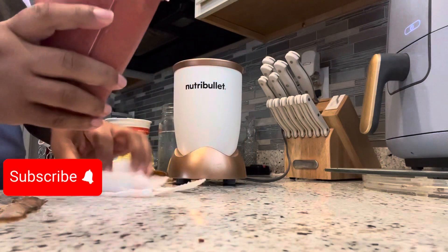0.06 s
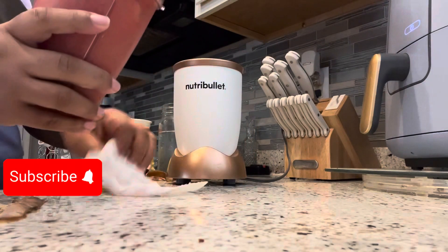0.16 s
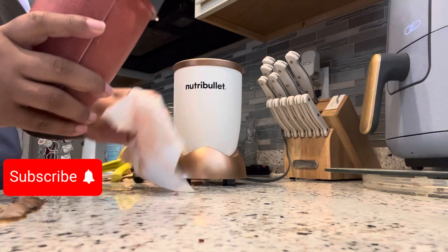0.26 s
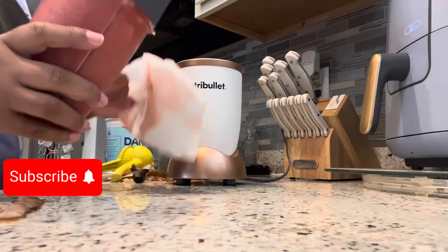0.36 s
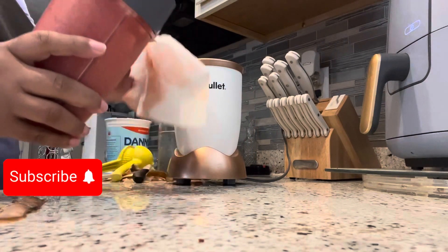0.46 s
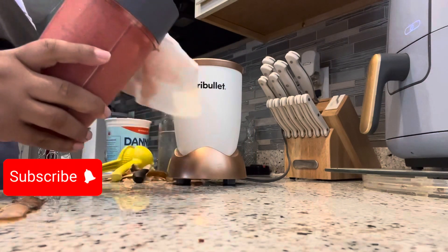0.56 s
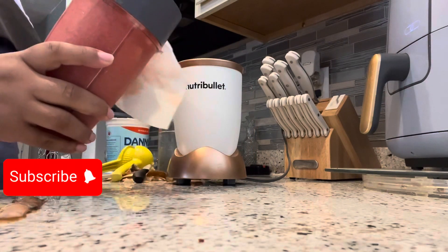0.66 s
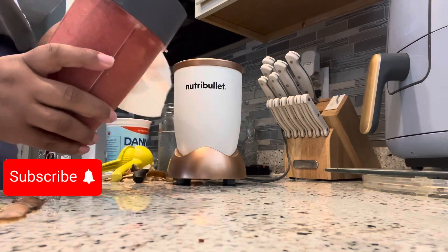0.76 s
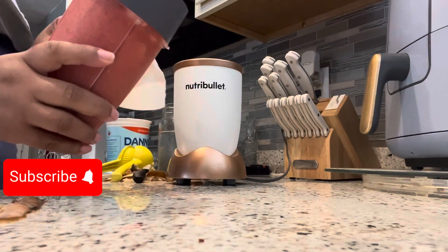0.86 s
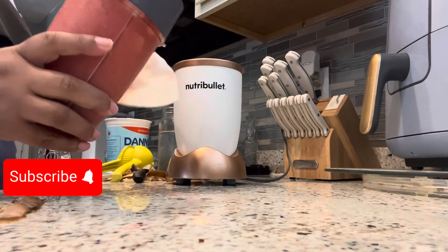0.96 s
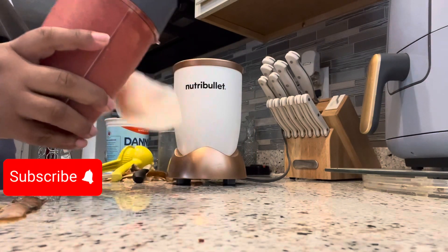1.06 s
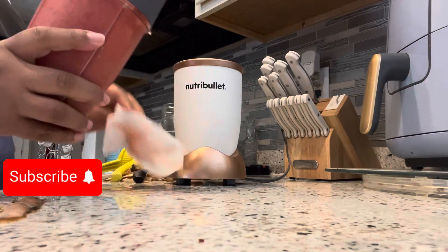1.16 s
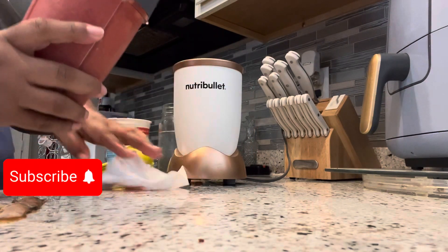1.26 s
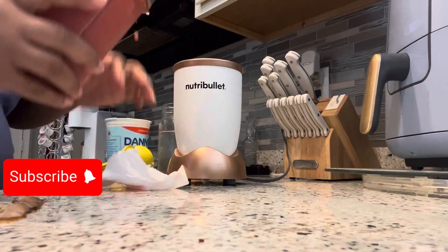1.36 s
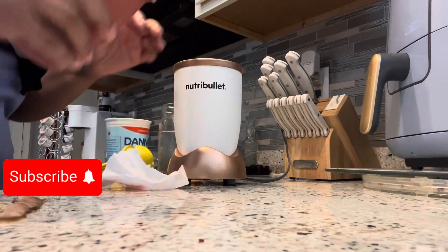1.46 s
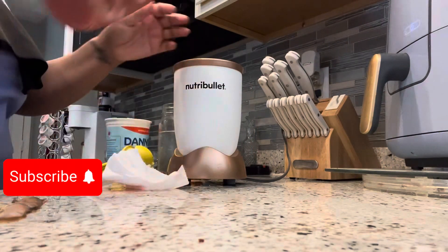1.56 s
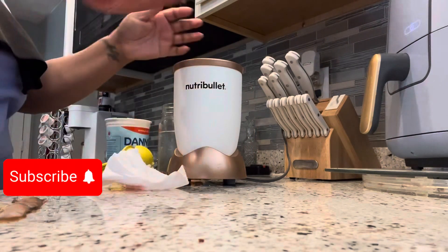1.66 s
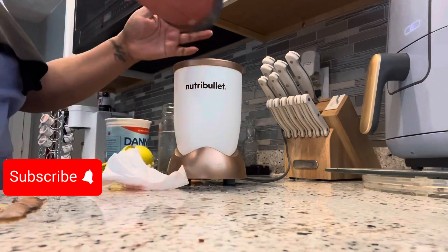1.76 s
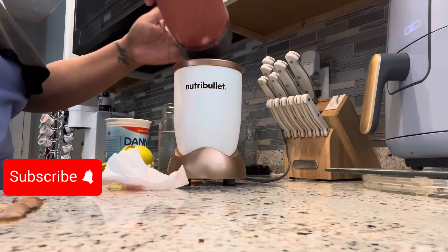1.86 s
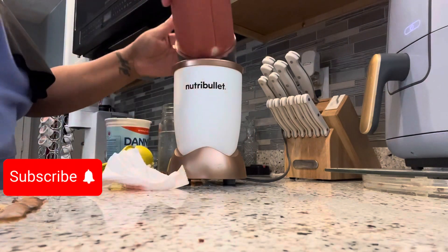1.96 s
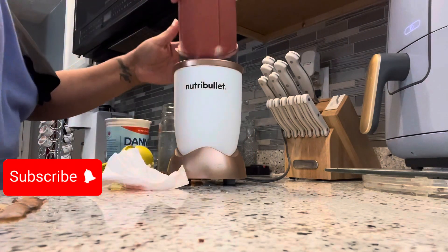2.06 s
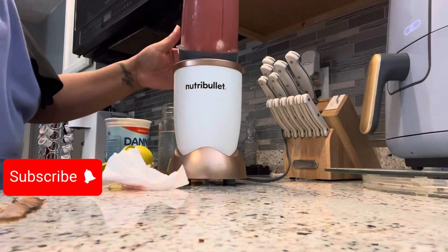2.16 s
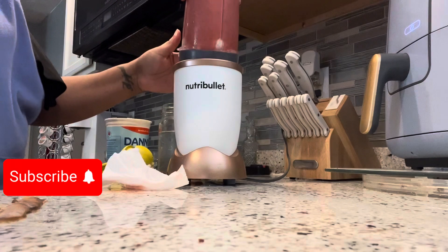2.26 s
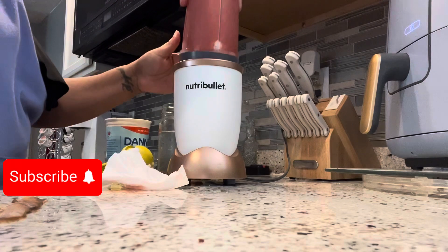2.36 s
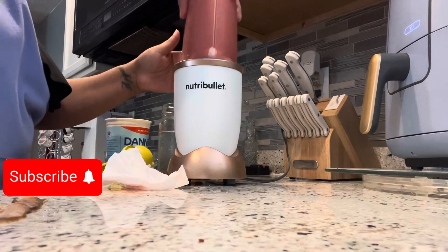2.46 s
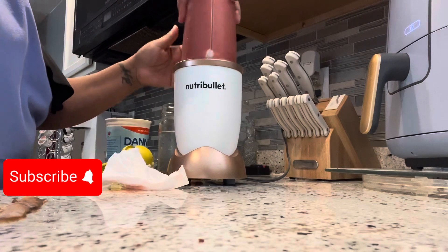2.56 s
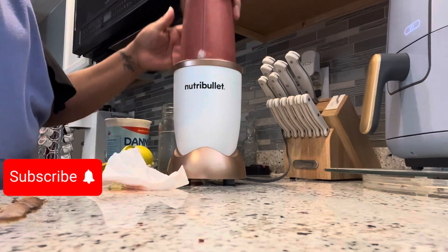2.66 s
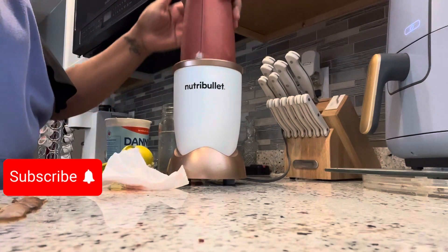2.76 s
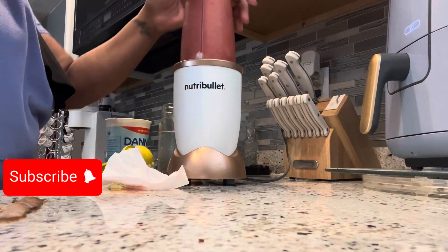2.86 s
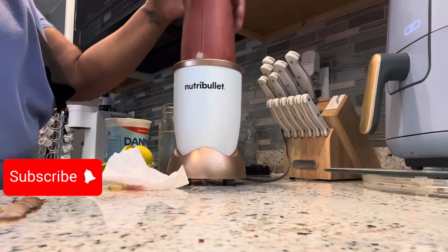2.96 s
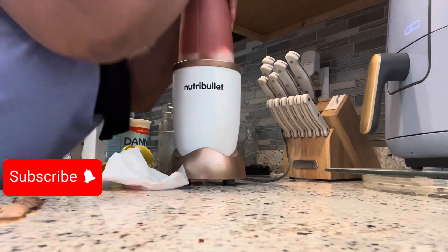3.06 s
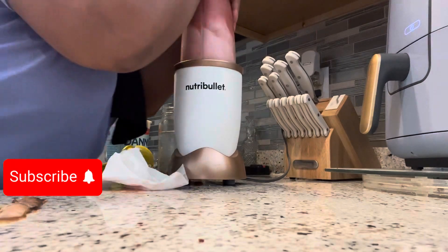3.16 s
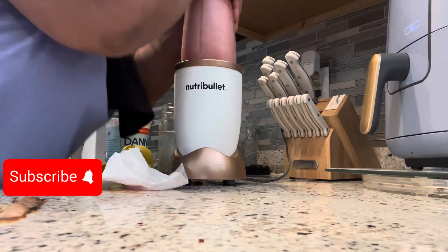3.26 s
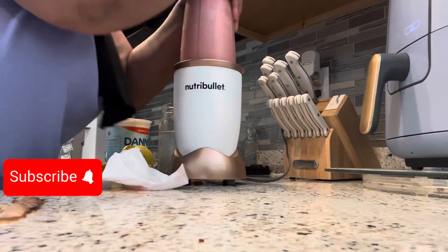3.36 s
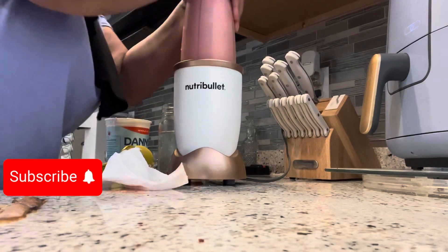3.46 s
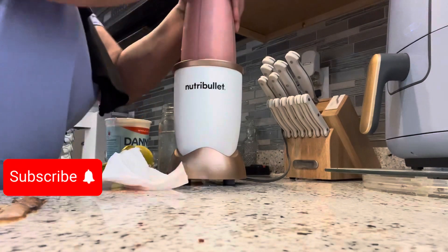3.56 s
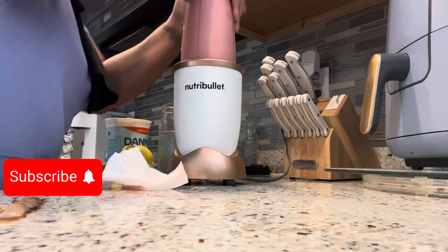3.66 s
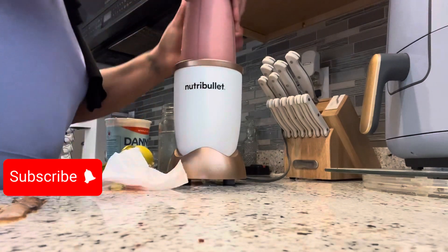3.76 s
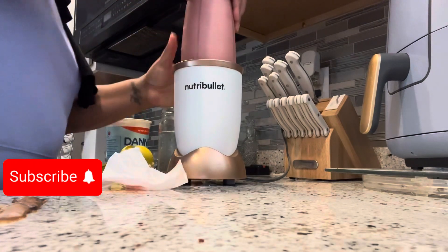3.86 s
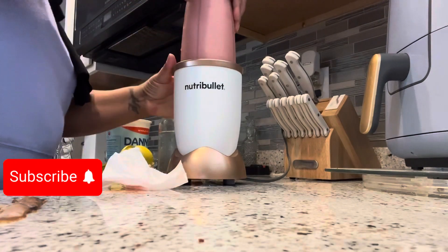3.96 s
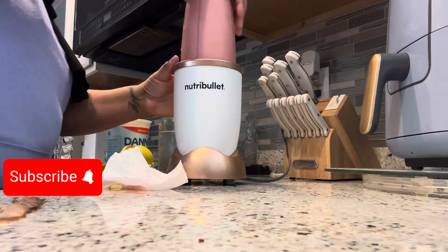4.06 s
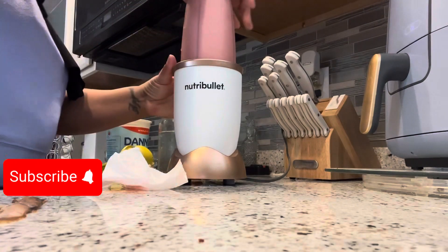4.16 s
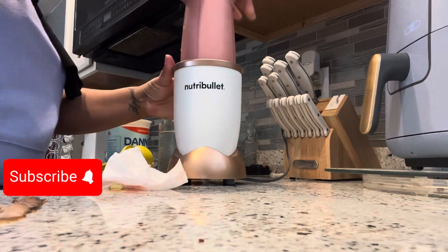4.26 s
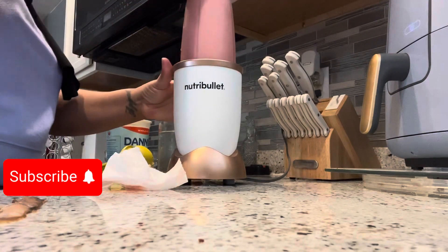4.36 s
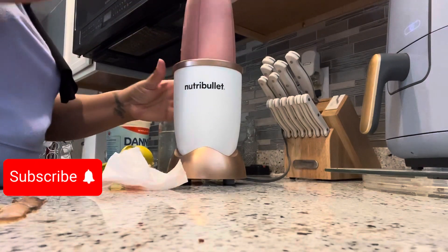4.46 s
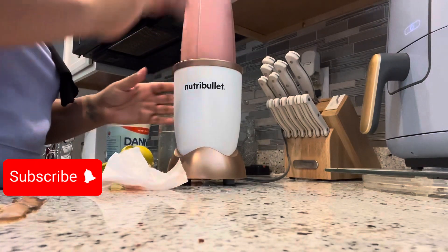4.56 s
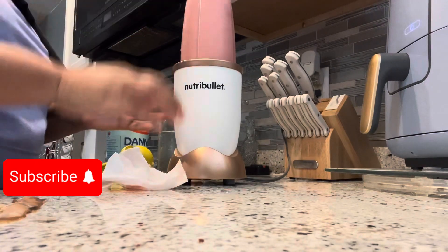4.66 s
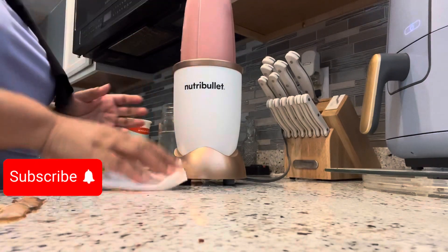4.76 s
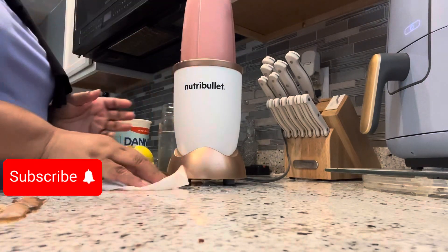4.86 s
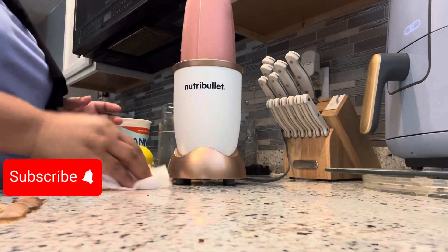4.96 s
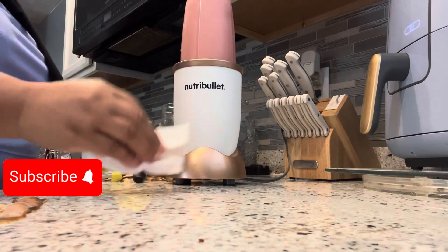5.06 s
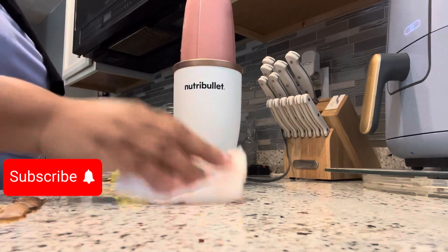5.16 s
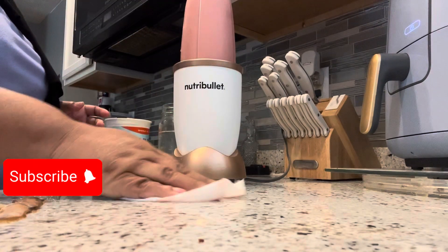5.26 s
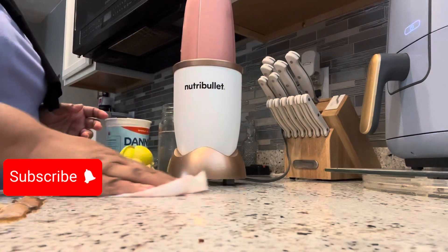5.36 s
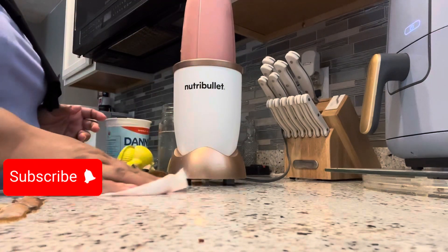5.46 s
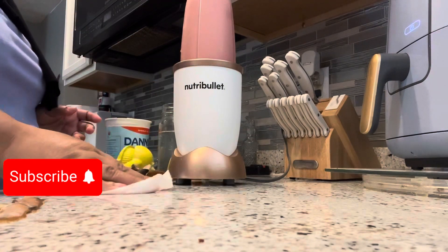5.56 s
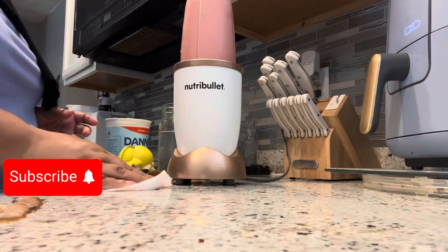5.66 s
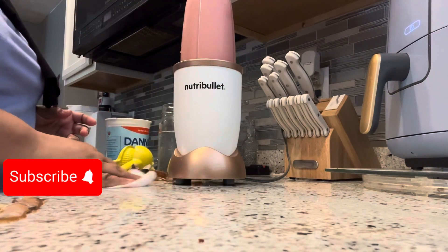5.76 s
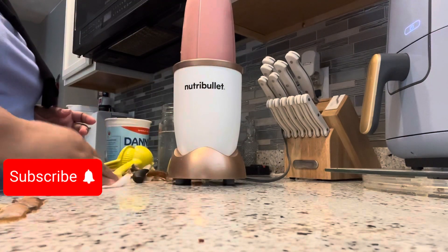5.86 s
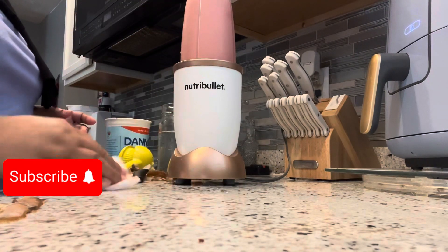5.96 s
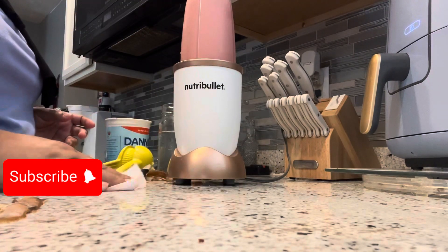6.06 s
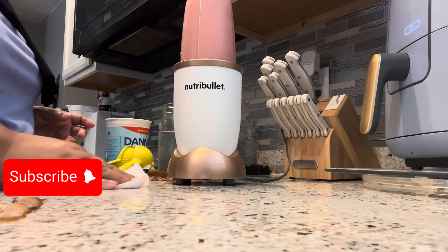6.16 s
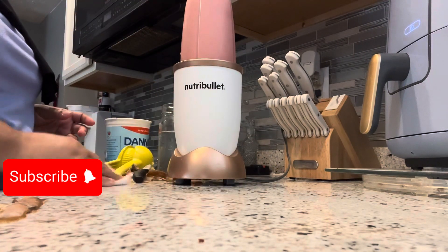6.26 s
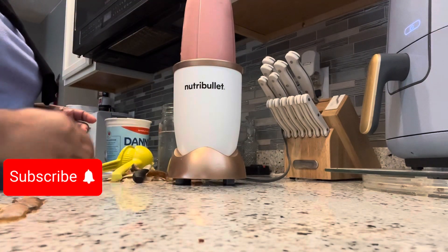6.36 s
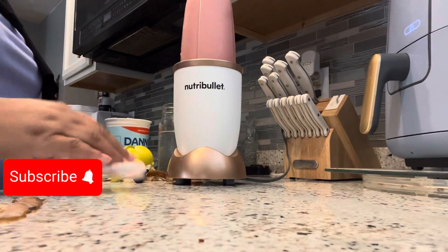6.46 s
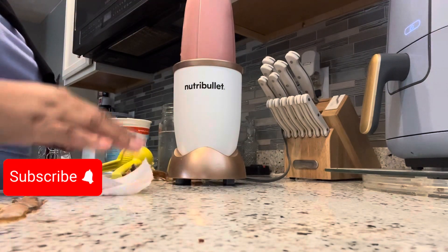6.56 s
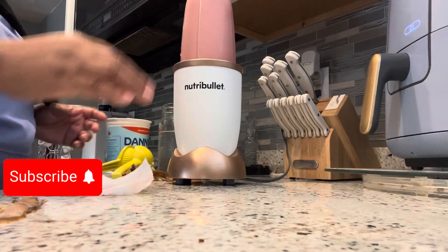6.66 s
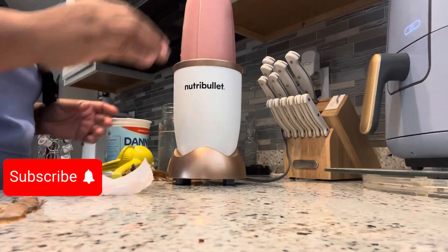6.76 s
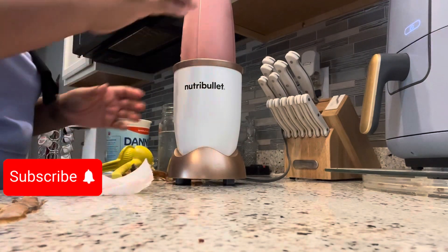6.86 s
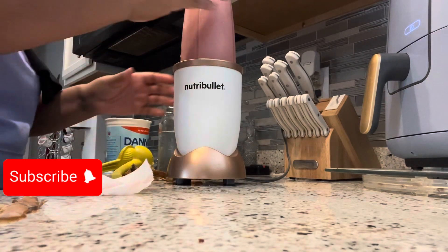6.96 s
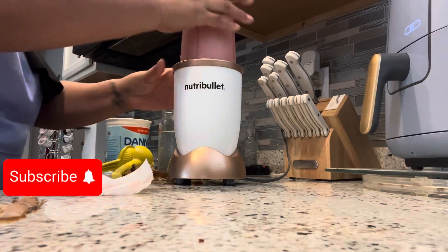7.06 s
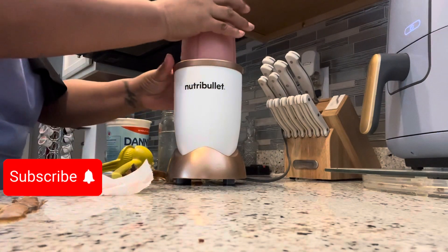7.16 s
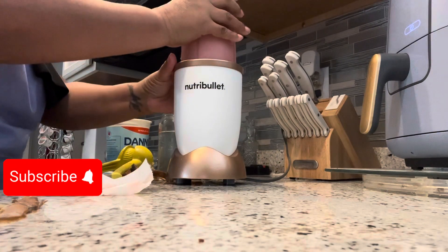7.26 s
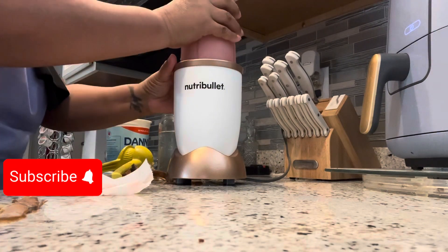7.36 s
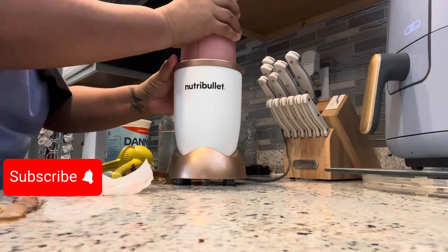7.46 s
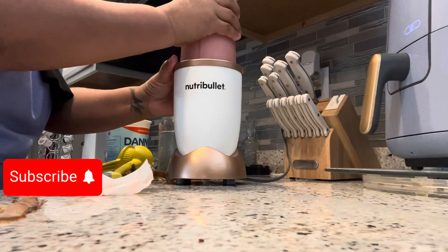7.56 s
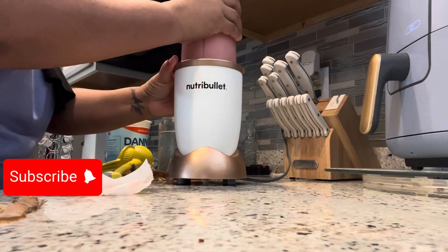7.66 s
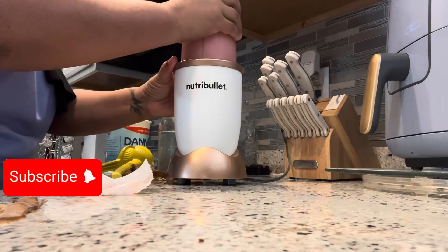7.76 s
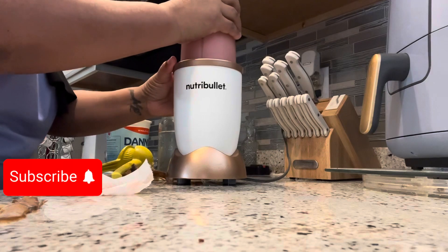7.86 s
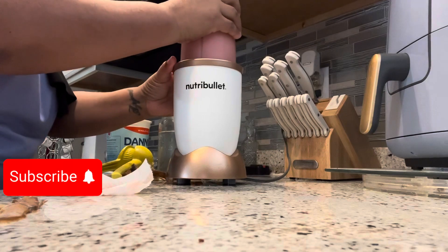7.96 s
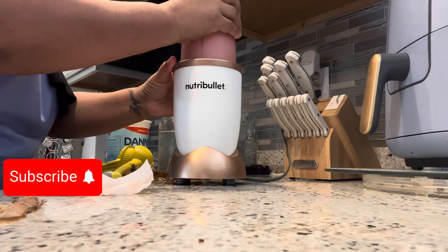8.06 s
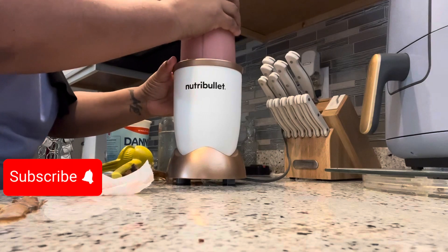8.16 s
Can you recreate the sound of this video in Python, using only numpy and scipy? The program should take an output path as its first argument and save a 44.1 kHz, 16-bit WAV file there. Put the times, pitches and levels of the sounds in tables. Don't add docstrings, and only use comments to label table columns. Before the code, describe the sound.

Close on a stone kitchen counter, a paper towel swishes over a plastic cup above a faint refrigerator hum. Around two seconds the cup knocks hollowly into its base, with heavy counter thuds. At three seconds a small blender bursts on, lumpy and rough, then smooths into a hissing, whining roar. It stops abruptly at the end with a faint falling chatter.

```python
import sys
import numpy as np
from scipy import signal
from scipy.fft import rfft, irfft, next_fast_len
from scipy.io import wavfile
from scipy.ndimage import uniform_filter1d, minimum_filter1d

SR = 44100
rng = np.random.default_rng(int(sys.argv[2]) if len(sys.argv) > 2 else 0)


def put_to_file(sound):
    columns = np.atleast_2d(sound).T
    safe = np.clip(columns, -1, 1)
    whole_steps = np.round(safe * 32767)
    wavfile.write(sys.argv[1], SR, whole_steps.astype(np.int16))


def elevation(decibels):
    levels = np.asarray(decibels, float)
    return 10 ** (levels / 20)


N = 362943
HOP = 128
START_S, GRIP_S, STOP_S = 3.0, 7.575, 7.99

# t/s, width/s, buzz/dB, tone/dB, air/dB
TOUCHES = [
    (3.55, 0.31, -1, .1, 1),
    (4.33, 0.065, 9, 0, 0.5),
    (5.9, 0.4, 2.5, 1, 1.6),
    (6.4, 0.14, 3, 0.3, 1),
    (6.8, 0.15, -4.5, -0.5, 1),
    (7.3, 0.2, 4, -4, 2.5),
]


def evened(x):
    return x / np.sqrt(np.mean(x ** 2) + 1e-20)


def read(points, hz):
    f, value = np.transpose(points)
    return np.interp(np.log(hz + 1), np.log(f + 1), value)


def curves(rows):
    s, *columns = np.transpose(rows)
    t = np.arange(N) / SR
    inside = 1. * (t >= s[0]) * (t <= s[-1])
    return [np.interp(t, s, c) for c in columns], uniform_filter1d(inside, size=200)


def bells(rows):
    t = np.arange(N // HOP + 2) * HOP / SR
    s, width, *heights = np.transpose(rows)
    shape = np.exp(-.5 * ((t[:, None] - s) / width) ** 2)
    return [np.interp(np.arange(N) / SR, t, shape @ h) for h in heights]


def soft_switch(s, over_s):
    return .5 + .5 * np.tanh((np.arange(N) / SR - s) / over_s)


def drift(hz):
    count = N // HOP + 2
    f = np.fft.rfftfreq(count, HOP / SR)
    slow = irfft(rfft(rng.standard_normal(count)) / (1 + (f / hz) ** 2), count)
    return np.interp(np.arange(N) / HOP, np.arange(len(slow)), evened(slow))


def resonate(x, hz, width):
    return signal.lfilter(*signal.iirpeak(hz, hz / width, SR), x)


def hiss(spectrum, patchy_db, lo_hz=0, hi_hz=1e5):
    frames, hz = N // HOP + 5, np.fft.rfftfreq(4 * HOP, 1 / SR)
    patches = rng.standard_normal((frames, len(hz))).T
    patches = uniform_filter1d(patches, size=6, axis=0)
    patches = evened(uniform_filter1d(patches, size=20, axis=1))
    z = rng.standard_normal((frames, len(hz), 2, 2)).T
    share = 1 / np.sqrt((1 + (lo_hz / (hz + 1)) ** 8) * (1 + (hz / hi_hz) ** 8))
    z = (z[0] + 1j * z[1]) * elevation(read(spectrum, hz)[:, None] + patchy_db * patches) * share[:, None]
    return evened(signal.istft(z, nperseg=4 * HOP, noverlap=3 * HOP)[1][:, :N])


def blend_law():
    # t/s, lumps/dB
    coarseness = [(3.002, -13.5), (3.3, -22), (3.4, -22.5), (3.9, -22), (4.4, -26.5), (5.0, -24.5),
                  (6.0, -31), (7.1, -28), (7.65, -32), (7.9, -36.5), (8.23, -28.5)]
    # t/s, width/s, lift/dB, splash/dB
    pieces = [(3.058, 0.024, 1.5, 6), (3.132, 0.019, 4, 8), (3.19, 0.016, 10, 0.5), (3.25, 0.017, 9, -1.5),
              (3.295, 0.013, 10.5, -4), (3.35, .02, 2, -4.5), (3.41, 0.021, 7, 1), (3.57, 0.0073, 8, -1.5),
              (3.98, 0.012, 0, 0), (4.51, 0.02, 4, 0), (5.09, 0.11, -0.5, -0.5), (5.79, 0.074, 6, -0.05),
              (6.14, 0.068, 7.5, -0.3), (6.74, 0.047, 1, -0.2), (7.98, .03, 6, -0.9)]
    (fruit_db,), on = curves(coarseness)
    t = np.arange(N) / SR
    since, after = np.maximum(t - START_S, 0), np.maximum(t - STOP_S, 0)
    lift_db, splash_db = bells(pieces)
    splash_db = splash_db + bells(TOUCHES)[-1]
    spin_db = -19 * np.exp(-since / 0.026)
    coast_db = -171 * after
    drop_db = -15.5 * (1 - np.exp(-after / 0.018)) + 0.33 * coast_db

    gain_db = 0.5452 * since - 2.5 * np.exp(-since / 0.21) + splash_db + spin_db
    air_db = -33 + gain_db + coast_db
    fizz_db = -33 - 18 + 1.3 * gain_db + 0.74 * coast_db
    lumps_db = fruit_db + lift_db + .5 * spin_db + drop_db
    calm_db = -10.5 * (1 - np.exp(-since / 1.7))
    shake_db = -2.5 + 1.037 * fruit_db + 0.22 * lift_db + calm_db
    shake_db = shake_db - 1.2 * spin_db ** 2 / 19 + 0.21 * drop_db
    return (lumps_db, air_db, fizz_db, shake_db), on


def blending():
    # f/Hz, width/Hz, level/dB
    cup_modes = [(250, 160, -24.5), (365.7, 42, -2), (385, 32.3, 4.5), (440, 49.3, 1), (490, 25, -2),
                 (532, 5.2, -3.5), (552.5, 9, -8.5), (576.8, 19.2, -3)]
    # f/Hz, width/Hz, level/dB
    housing_modes = [(575.2, 13, 6.5), (1175, 47, -6.5), (1466, 20, -4.5), (1719, 39, -6),
                     (3390, 280, -2.5), (11200, 160, -31)]
    # f/Hz, width/Hz, level over the air/dB
    blade_modes = [(2390, 33, -13.5), (2976, 59, -12)]
    # f/Hz, density/dB per Hz
    air_colour = [(40, -18), (90, -64), (200, 32), (320, -5), (700, -2), (1000, 3.5), (1300, -4),
                  (1800, -2), (2500, -7), (3400, -8.5), (5000, -13), (7000, -19), (10000, -32),
                  (14000, -33)]
    (lumps_db, air_db, fizz_db, shake_db), on = blend_law()
    t = np.arange(N) / SR

    per_s = np.interp(t, [3.3, 4.6], [500, 1500])
    blows = (rng.random((2, N)) < per_s / SR) * rng.standard_normal((2, N)) / np.sqrt(per_s)
    wall = 0
    for k, (f, width, db) in enumerate(cup_modes):
        wall = wall + (-1) ** k * elevation(db) * resonate(blows, f, width)
    wall = evened(resonate(resonate(evened(wall), 468, 360), 450, 465))

    white = rng.standard_normal((2, N))
    housing = sum(elevation(db) * evened(resonate(white, f, width)) for f, width, db in housing_modes)
    air = evened(hiss(air_colour, patchy_db=1.0, lo_hz=680, hi_hz=6400) + 0.41 * housing)
    cutting_db = np.interp(t, [3.6, 4.2], [-4, -20]) + 3.5 * drift(11.5)
    blade = sum(elevation(db) * evened(resonate(white, f, width)) for f, width, db in blade_modes)
    air += elevation(cutting_db) * blade

    fizz = hiss(air_colour, patchy_db=3.0, lo_hz=5840)
    spray = elevation(0.63 * drift(30))
    rumble = hiss(air_colour, patchy_db=2.5, lo_hz=70, hi_hz=300)
    jolts = 0.76 * evened(resonate(blows, 118, 22)) + 3.03 * evened(resonate(blows, 337, 39))
    shake = evened(rumble + jolts)
    wet = spray * (elevation(air_db + 3.5) * air + elevation(fizz_db + 5) * fizz)
    return on * (elevation(lumps_db + 4.0) * wall + wet + elevation(shake_db) * shake)


def shaft_law():
    clear_s = 4.2
    t = np.arange(N) / SR
    touch_buzz_db, touch_tone_db, _ = bells(TOUCHES)
    sag_hz = 26.74 * np.exp(-np.maximum(t - clear_s, 0) / .5)
    hz = 363.3 - sag_hz - 3.3 * soft_switch(GRIP_S, 0.078)
    tone_db = -20 - 0.97 * sag_hz + touch_tone_db
    buzz_db = -53 + 12 * soft_switch(5.9, 1) + touch_buzz_db
    whine_db = -50.5 - 5 * (1 - soft_switch(5.4, .15)) - 14 * np.maximum(t - GRIP_S, 0)
    on = uniform_filter1d(1. * (t >= clear_s) * (t <= STOP_S + .012), size=1200)
    return (hz, tone_db, buzz_db, whine_db), on


def motor():
    # shaft multiple, level under a steady -20/dB
    multiples = [(3, -29), (4, -40.5), (8, -30)]
    bar_count, mains_hz = 24, 120.6
    (hz, tone_db, buzz_db, whine_db), on = shaft_law()
    t = np.arange(N) / SR
    wander_hz = .6 + .7 * drift(11)
    shaft = 2 * np.pi * np.cumsum(hz + wander_hz) / SR
    mains = 2 * np.pi * mains_hz * t
    held_db = -15 * uniform_filter1d(1. * (t > GRIP_S), size=600)
    out = elevation(tone_db + held_db + 1.4 * drift(8)) * np.cos(shaft)
    buzz = np.cos(mains) + 2.7 * np.cos(shaft + mains) + 0.32 * np.cos(shaft - mains)
    out += elevation(buzz_db + drift(6.0)) * buzz
    bars = np.cos(bar_count * shaft) + .45 * np.cos(bar_count * shaft + mains)
    out += elevation(whine_db - 4 + 3 * drift(14)) * bars
    for k, db in multiples:
        out += elevation(db - 18.5 + 1.7 * drift(33)) * np.cos(k * shaft)
    out *= on * np.sqrt(2)
    return np.array([out, np.roll(out, 37)])


def coasting():
    # t/s, f/Hz, level/dB
    chatter = [
        (8.02, 490, -48),
        (8.095, 449, -50),
        (8.11, 440, -33.5),
        (8.13, 433, -61),
        (8.175, 392, -40),
        (8.19, 392, -56),
        (8.21, 368, -44),
        (8.225, 368, -63),
    ]
    (hz, db), on = curves(chatter)
    out = on * elevation(db + 2 * drift(35)) * np.cos(2 * np.pi * np.cumsum(hz) / SR)
    return np.array([out, np.roll(out, 37)])


def echoed(x, t60, wet_db, split_hz=2500, bright_t60=0.075):
    t = np.arange(SR // 2) / SR
    chance = rng.standard_normal((2, len(t)))
    low = signal.sosfilt(signal.butter(2, split_hz, fs=SR, output="sos"), chance)
    tails = low * elevation(-60 * t / max(t60, .02)) + (chance - low) * elevation(-60 * t / max(bright_t60, .02))
    tails /= np.linalg.norm(tails, axis=1)[:, None]
    wet = signal.oaconvolve(x[None], tails, axes=1)[:, :N]
    return np.array([x + elevation(wet_db) * wet[0], wet[1]])


def knocks():
    # t/s, blow/dB, crack/dB, tick/dB, ring f/Hz
    hits = [(0.901, -54, -67, -56, 382), (1.197, -56, -53.5, -51, 453), (1.91, -57, -68, -60, 474),
            (1.98, -26.5, -36.5, -42, 493), (2.032, -26, -40.5, -54, 490), (2.057, -29.5, -43, -47, 486),
            (2.145, -31, -39.5, -43, 445), (2.234, -38, -52.5, -70, 440), (2.284, -40, -53, -62, 453),
            (2.329, -46, -43.5, -32, 380), (2.344, -37, -57, -54, 380), (2.452, -41, -44, -39, 384),
            (2.462, -15.5, -38.5, -58, 414), (2.526, -47, -48.5, -73, 463), (2.553, -34, -65, -70, 404),
            (2.608, -25.5, -52, -44, 407), (2.679, -35, -76, -65, 380), (2.692, -17, -32, -43, 440),
            (2.705, -8.5, -44, -41, 386), (2.718, -21.5, -46, -55, 446), (2.746, -28, -49, -63, 380),
            (2.957, -49, -55, -64, 490), (2.976, -31, -52, -69, 406)]
    # t/s, level/dB
    thuds = [(1.98, -20.5), (2.034, -26), (2.069, -23), (2.146, -23), (2.344, -38), (2.461, -14),
             (2.609, -28.5), (2.693, -21), (2.704, -23), (2.717, -8.5), (2.976, -40)]
    # f/Hz, level/dB, t60/s
    counter_modes = [(96, 5, 0.063), (172, -1, 0.076), (261, 1.5, 0.062)]
    # f/Hz, density/dB per Hz
    crack_colour = [(700, 9), (1300, 1.5), (2000, -5.5), (3500, -7.5), (6500, -10.5), (10000, -40)]
    t, out = np.arange(9000) / SR, np.zeros(N + 9000)
    colour = elevation(read([(100, -38), *crack_colour], np.fft.rfftfreq(len(t), 1 / SR)))
    chance = irfft(rfft(rng.standard_normal((len(hits), len(t)))) * colour, len(t))
    treble = signal.butter(2, 5500, "high", fs=SR, output="sos")
    edges = signal.sosfilt(treble, rng.standard_normal(chance.shape))
    for (s, blow_db, crack_db, tick_db, hz), grit, edge in zip(hits, chance, edges):
        ring = elevation(-60 * t / 0.027) * np.sin(2 * np.pi * hz * t) * (1 - np.exp(-t / 0.0021))
        crack = evened(grit) * (elevation(-60 * t / 0.043) + elevation(-33.0 - 60 * t / 0.053))
        tick = edge * (elevation(-60 * t / 0.028) + elevation(-38 - 60 * t / 0.038))
        hit = elevation(blow_db + 14.0) * ring + elevation(crack_db + 9.5) * crack + elevation(tick_db + 7.0) * tick
        at = round(s * SR)
        out[at:at + len(t)] += hit
    thud = sum(elevation(db - 60 * t / t60) * np.sin(2 * np.pi * f * t) for f, db, t60 in counter_modes)
    thud = thud * (1 - np.exp(-t / 0.0058))
    for s, thud_db in thuds:
        out[round(s * SR):][:len(t)] += elevation(thud_db) * thud
    return echoed(out[:N], t60=0.18, wet_db=-7.5)


def wiping():
    # peak t/s, swish/dB, crisp edge/dB, rise/s per 20 dB, fall/s per 20 dB
    strokes = [
        (.06, -47, -50, 0.054, 0.24),
        (.14, -56, -65, 0.094, 0.1),
        (.72, -61.5, -59.5, 0.49, 0.5),
        (1.17, -61, -68, 0.064, 0.21),
        (1.9, -77, -75, .1, 0.11),
        (2.2, -76, -79, .15, .1),
        (2.4, -49.5, -48, 0.22, 0.14),
        (2.6, -53.5, -63, .05, 0.27),
    ]
    # f/Hz, density/dB per Hz
    paper_colour = [(400, 1), (1000, 4), (2500, -3.5), (5000, -1), (8000, -7), (12000, -3), (14500, -11)]
    t, envelopes = np.arange(N) / SR, np.zeros((2, N))
    for s, swish_db, crisp_db, rise_s, fall_s in strokes:
        shape = elevation(-20 * np.maximum((s - t) / rise_s, (t - s) / fall_s))
        envelopes += elevation([[swish_db], [crisp_db]]) * shape
    swish, crisp = envelopes
    paper = swish * hiss(paper_colour, patchy_db=-1.5, hi_hz=6950)
    paper = paper + elevation(-4.0) * crisp * hiss(paper_colour, patchy_db=2.0, lo_hz=7000)
    return paper * elevation(2.0 * drift(60))


def refrigerator():
    # f/Hz, level/dB
    partials = [(59.2, -40.5), (118.4, -51), (242.2, -59.5), (306.8, -59), (468.3, -64), (522.2, -61)]
    t, hum = np.arange(N) / SR, np.zeros(N)
    for hz, db in partials:
        swell_db, lag = 1.6 * drift(7), .6 * drift(4)
        hum += elevation(db + 1.0 + swell_db) * np.cos(2 * np.pi * hz * t + lag)
    return hum


def room_air():
    # f/Hz, density/dB per Hz
    room_colour = [(30, -31), (90, -8), (180, 0), (300, -4.5), (500, -3.5), (700, -13), (900, -10.5),
                   (1400, -20), (2500, -27), (4000, -34), (7000, -41), (13000, -53)]
    return elevation(-46.5) * hiss(room_colour, patchy_db=1.6)


def ports(pair, lean, alike):
    # f/Hz, likeness 0-1, left lead/rad, left over right/dB
    port_pair = [(190, .93, -.6, -.8), (300, .9, 0, -14), (450, .8, .3, -13), (530, .95, 2.8, -1),
                 (620, .85, 1.9, -1.5), (1100, .4, -.3, -5), (2400, .55, -.1, 2.7), (4500, .3, -1.4, -3),
                 (6500, .3, 2.5, -1), (7200, .9, 3.1, -.5), (8400, .9, -3.0, -.5), (10600, .9, 0, 0),
                 (12800, .9, 0, 0), (14000, .9, 3.1, 0)]
    size = next_fast_len(N)
    hz, z = np.fft.rfftfreq(size, 1 / SR), rfft(pair, size)
    f, same, turn, db = np.transpose(port_pair)
    likeness = np.clip(alike * same, 0, 1) * np.exp(1j * turn)
    link = np.interp(np.log(hz + 1), np.log(f), likeness)
    left = link * z[0] + np.sqrt(1 - abs(link) ** 2) * z[1]
    left = elevation(lean * read(np.c_[f, db], hz)) * left
    return irfft(np.array([left, z[0]]), size)[:, :N]


def scene():
    # t/s, gain/dB
    phone_gain = [
        (0, -1),
        (2.978, 0.5),
        (2.99, -13),
        (2.999, -28),
        (3.0, -20),
        (7.99, -17),
        (8.23, -27),
    ]
    (gain_db,), _ = curves(phone_gain)
    blender = ports(blending(), lean=1.13, alike=0.83)
    blender = blender + ports(motor() + coasting(), lean=0.79, alike=1.05)
    handling = ports(knocks(), lean=0.97, alike=0.75)
    kitchen = ports(room_air() + wiping(), lean=0.82, alike=0.54) + refrigerator()
    return blender + elevation(gain_db) * (handling + kitchen)


def top_cut(x):
    return signal.sosfilt(signal.butter(12, 14970, fs=SR, output="sos"), x)


def record(dry):
    # f/Hz, level/dB
    response = [(20, -30), (45, 3.5), (60, 1.5), (13200, -0.5), (14200, -1), (15500, -24), (17000, -62)]
    room_left = np.minimum(.9 / (abs(dry).max(0) + 1e-9), 1)
    limited = dry * uniform_filter1d(minimum_filter1d(room_left, size=400), size=400)
    taps = irfft(elevation(read(response, np.fft.rfftfreq(4096, 1 / SR))))
    taps = np.fft.fftshift(taps) * np.hanning(4096)
    return top_cut(signal.oaconvolve(limited, taps[None], "same"))


dry = scene()
out = record(dry)
put_to_file(out)
```